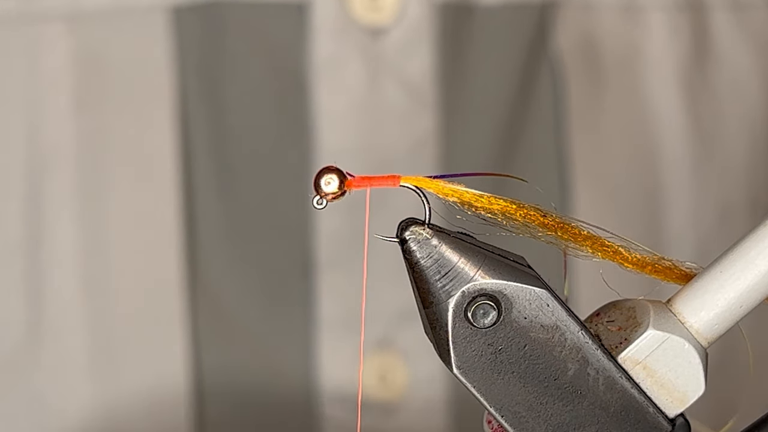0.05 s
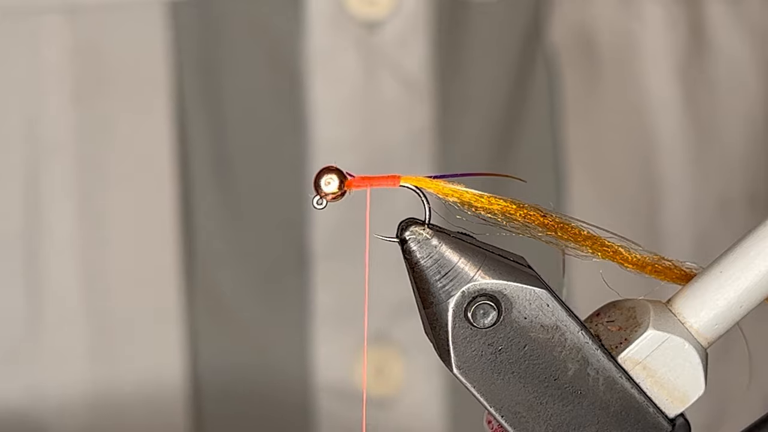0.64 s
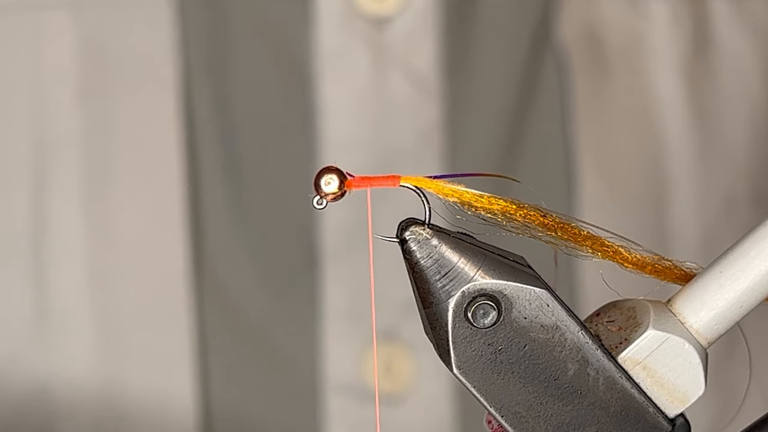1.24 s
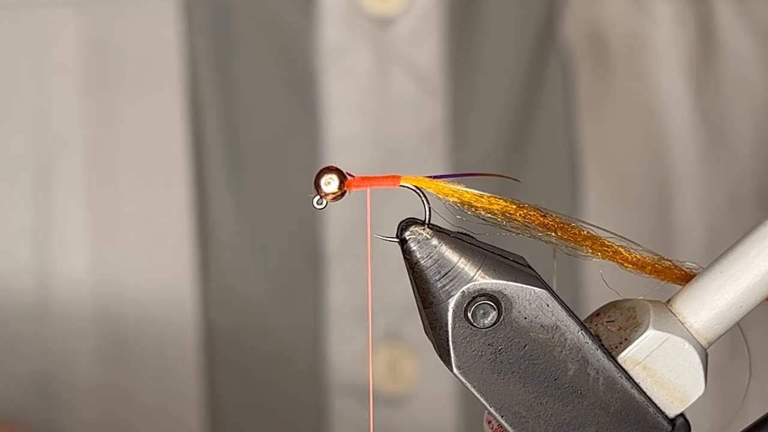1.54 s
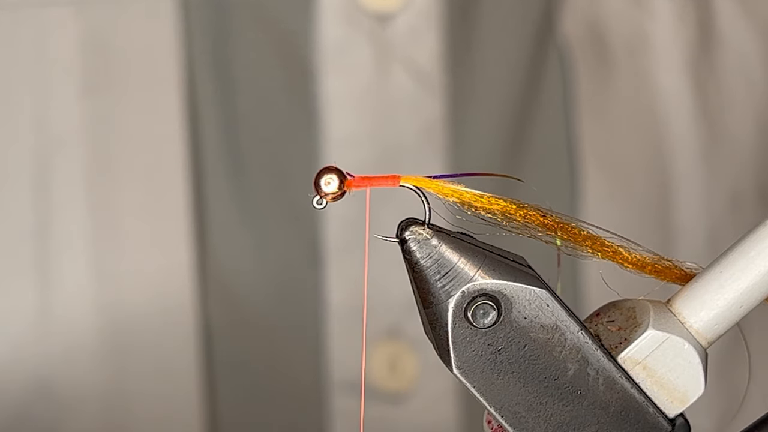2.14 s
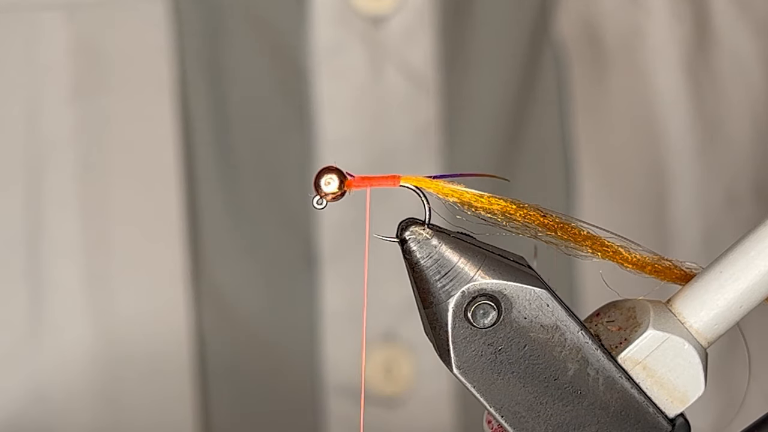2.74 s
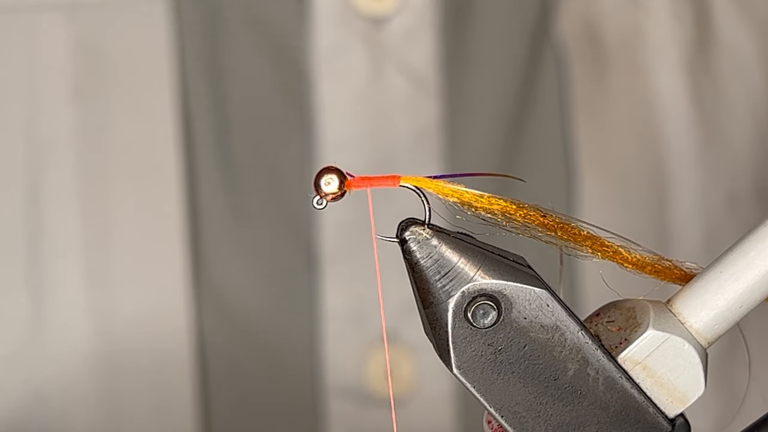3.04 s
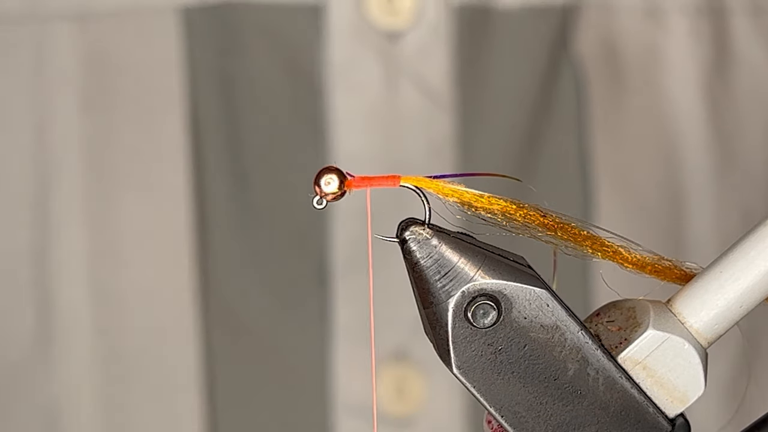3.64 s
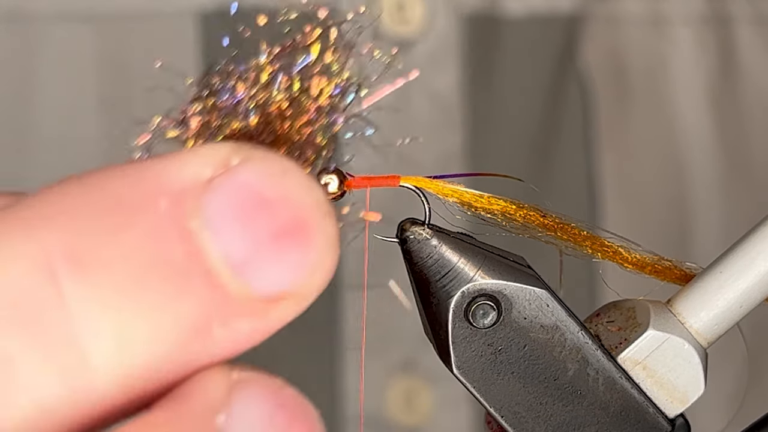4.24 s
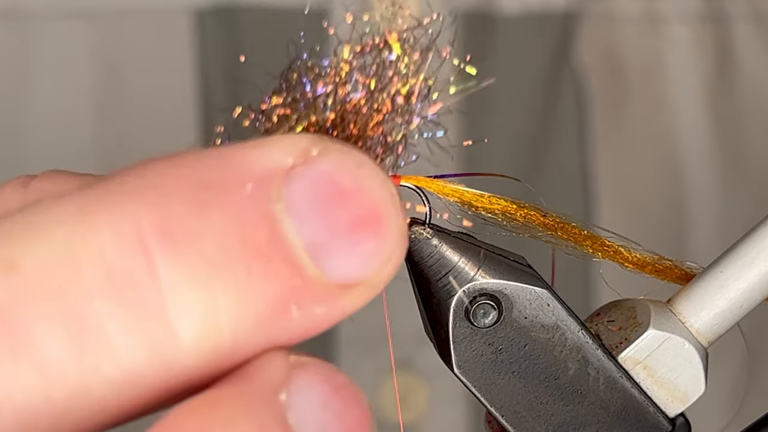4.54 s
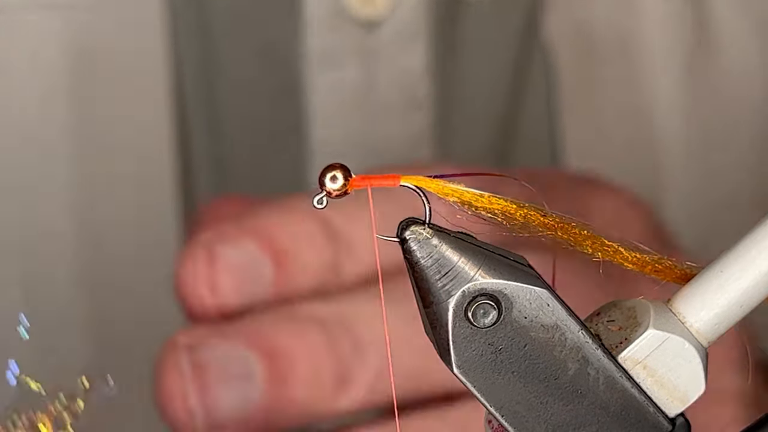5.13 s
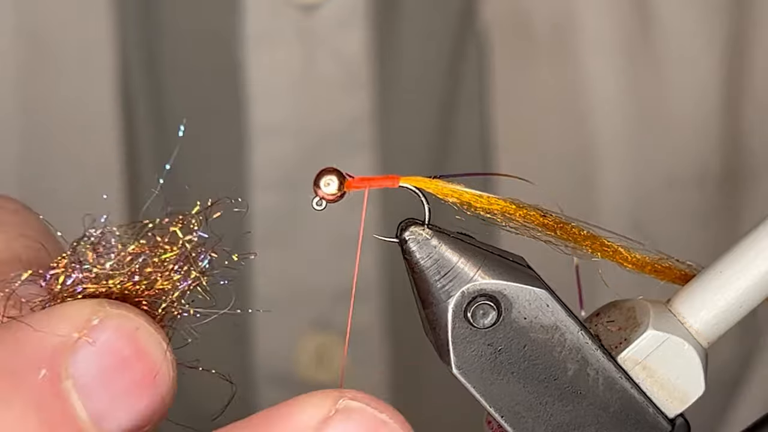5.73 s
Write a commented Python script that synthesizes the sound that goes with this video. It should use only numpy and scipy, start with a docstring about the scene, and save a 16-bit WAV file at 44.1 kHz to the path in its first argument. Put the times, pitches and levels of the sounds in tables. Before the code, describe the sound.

Fingers pull synthetic fibres from a thin plastic bag close to the microphone. The bag rustles and crinkles with sharp, irregular snaps for about three seconds. Then the handling gets softer and sparser: a few ticks and a faint sizzle of fibre tips brushing a metal hook, dying away near the end. Light knocks and low bumps come from the desk throughout, in a small, quiet room.

```python
"""A thin plastic bag rustles and snaps close by as fingers tease out synthetic dubbing at a fly-tying desk.
The film snaps by buckling; fibres and skin crackle by stick-slip friction, and fibre tips sizzle on the hook.
Knocking hands excite the modes of the desk, which also rumbles under leaning arms and after some knocks.
A small room reverberates; a faint low drone swells twice just past half way."""
import sys
import numpy as np
from scipy import signal
from scipy.fft import rfft, irfft, next_fast_len
from scipy.io import wavfile
from scipy.ndimage import uniform_filter1d

SR = 44100
rng = np.random.default_rng(int(sys.argv[2]) if len(sys.argv) > 2 else 0)


def master_out(mix):
    """Clip the mix to full scale and print it as 16-bit PCM to the path in sys.argv[1]."""
    frames = np.transpose(np.atleast_2d(mix))
    ceiling = np.clip(frames, -1, 1)
    pcm = np.round(ceiling * 32767).astype(np.int16)
    wavfile.write(sys.argv[1], SR, pcm)


N = 255025
TIME = np.arange(N) / SR
BAG_DOWN_S = 2.8  # the fingers hold the bag until then


def amp(db):
    """Amplitude ratio of a level in decibels."""
    return 10 ** (np.asarray(db) / 20)

def unit(x):
    """Normalisation to rms 1."""
    return x / np.sqrt(np.mean(x ** 2) + 1e-20)

def pulse(x):
    """Normalisation of a transient to the energy of 1 ms at rms 1."""
    return x * np.sqrt(SR / 1000 / np.sum(x ** 2))

def along(points, hz):
    """Interpolation of (f, value) points on a logarithmic frequency axis."""
    f, value = np.transpose(points)
    return np.interp(np.log(hz + 1), np.log(f), value)

def add(track, s, x):
    """Superposition of x on the track from time s."""
    part = track[..., max(round(s * SR), 0):][..., :x.shape[-1]]
    part += x[..., :part.shape[-1]]

def filtered(x, response):
    """Linear filtering: the spectrum of x times a frequency response."""
    size = next_fast_len(N + SR // 2)
    return irfft(rfft(x, size) * response(np.fft.rfftfreq(size, 1 / SR)), size)[..., :N]

def coloured(x, spectrum):
    """Spectral shaping by (f, level) points, at rms 1."""
    return unit(filtered(x, lambda hz: amp(along(spectrum, hz))))

def band(x, hz, octaves, order):
    """Resonance as a causal band-pass around hz."""
    edges = np.clip(hz * 2 ** (np.array([-.5, .5]) * octaves), 20, SR / 2 - 500)
    return signal.sosfilt(signal.butter(order, edges, "band", fs=SR, output="sos"), x)

def swells(rows, rise_share, roundness):
    """Power sum of (t, length, level) envelopes, each within 10 dB of its peak for its length."""
    power = np.zeros(N)
    for s, length, db in rows:
        near = slice(max(int((s - 2 * length) * SR), 0), int((s + 2 * length) * SR))
        offset = (TIME[near] - s) / length
        distance = np.maximum(-offset / rise_share, offset / (1 - rise_share))
        power[near] += amp(db - 10 * distance ** roundness) ** 2
    return np.sqrt(power)

def stick_slip(per_s, spread_db, smooth):
    """Stick-slip friction: random impulses, a few of them large, over smooth sliding noise."""
    slips = (rng.random(N) < per_s / SR) * rng.choice([-1, 1], N)
    size = amp(spread_db * np.minimum(rng.exponential(size=N), 4))
    return unit(slips * size) + smooth * rng.standard_normal(N)

def drifting(x, depth_db=2.3):
    """Spectral modulation: the colour drifts at random as the contact moves."""
    spectra = signal.stft(x, nperseg=512)[2]
    drift = rng.standard_normal(spectra.shape)
    for axis in (0, 1, 0, 1):
        drift = uniform_filter1d(drift, size=7, axis=axis)
    return signal.istft(spectra * amp(depth_db * unit(drift)), nperseg=512)[1][:N]

def ring(modes, t):
    """Free vibration: a sum of damped modes with scattered strengths and phases."""
    hz, db, t60 = np.transpose(modes)[:, :, None]
    gain = amp(db + 2 * rng.standard_normal(hz.shape))
    phase = .8 * rng.standard_normal(hz.shape)
    partials = gain * np.sin(2 * np.pi * hz * t + phase) * amp(-60 * t / t60)
    return np.sum(partials, 0) / np.linalg.norm(gain)

def burst(hz, octaves, life_s, order):
    """Transient rough vibration: decaying noise in one band."""
    t = np.arange(SR // 40) / SR
    noise = rng.standard_normal(len(t)) * t * np.exp(-t / life_s)
    return pulse(band(noise, hz, octaves, order))

def flip(hz, life_s):
    """Heavily damped oscillation: one facet of film springs over."""
    t = np.arange(SR // 40) / SR
    return pulse(t * np.exp(-t / life_s) * np.sin(2 * np.pi * (hz * t + rng.random())))


# Spectrum of the still room: f/Hz, relative level/dB
AIR_SPECTRUM = [(22, -23), (40, 1), (60, 6.5), (125, 2.5), (250, -4.5), (500, -10), (1000, -19),
                (1900, -12.5), (4000, -20.5), (8000, -36.5), (12000, -28.5), (16000, -30)]
def room_air():
    """Ambient noise, partly coherent between the two channels."""
    noise = rng.standard_normal(N) + 0.5 * rng.standard_normal((2, N))
    return amp(-73.5) * coloured(noise, AIR_SPECTRUM)

# Course of the low tone: t/s, f/Hz, level/dB
DRONE_COURSE = [(3.18, 151.8, -69), (3.26, 147.4, -67), (3.39, 133, -57), (3.46, 131, -64),
                (3.54, 129, -80.5), (3.59, 133.7, -65.5), (3.65, 130.2, -62.5), (3.72, 128.6, -96)]
def drone(waver_depth=0.33):
    """Amplitude modulation: slow noise makes a faint, sagging sine tone waver."""
    times, hz, db = np.transpose(DRONE_COURSE)
    phase = 2 * np.pi * np.cumsum(np.interp(TIME, times, hz)) / SR
    gain = amp(np.interp(TIME, times, db)) * (TIME > times[0]) * (TIME < times[-1])
    waver = unit(filtered(rng.standard_normal(N), lambda f: np.exp(-(f / 20) ** 2)))
    return np.sqrt(2) * gain * (1 + waver_depth * waver) * np.sin(phase)

# Response of the small room: f/Hz, T60/s, relative level/dB, side-to-mid ratio
ROOM_RESPONSE = [(123, 0.15, -2, 0.5), (300, 0.037, 6, .8), (900, 0.24, 0, 0.91), (2480, 0.088, 4, 0.5),
                 (4540, 0.35, -7, 0.2), (7920, 0.25, -3, 0.1), (15110, 0.16, 4, 0)]
def reverberation(x, gap_s):
    """Convolution with decaying reflections, whose pattern is renewed every 0.2 s as the hands move."""
    out, step = np.zeros((2, N)), SR // 5
    for start in range(0, N, step):
        hz, t, spectra = signal.stft(rng.standard_normal((2, SR // 2)), SR, nperseg=256)
        t60, db, spread = (along(np.array(ROOM_RESPONSE)[:, [0, k]], hz)[:, None] for k in (1, 2, 3))
        spectra = spectra * amp(db - 60 * t / t60) * np.array([np.ones_like(spread), spread])
        mid, side = signal.istft(spectra, SR, nperseg=256)[1]
        tail = np.array([mid + side, mid - side]) / np.linalg.norm(mid)
        add(out, start / SR + gap_s, signal.fftconvolve(x[None, start:start + step], tail, axes=1))
    return out

# Low swells of desk rumble and the thuds after knocks: peak t/s, length/s, level/dB
DESK_SWELLS = [(0.18, 0.052, -59.5), (0.44, 0.24, -63.5), (0.688, .04, -50.5), (0.75, .06, -59),
               (0.85, 0.11, -51.5), (0.95, 0.18, -54), (1.32, 0.12, -63), (1.435, 0.027, -54.5),
               (1.68, 0.12, -58.5), (1.825, 0.078, -59), (2.24, 0.24, -68.5), (2.98, 0.21, -63),
               (3.35, 0.24, -67), (3.8, 0.059, -61), (3.995, 0.038, -54.5), (4.345, 0.09, -64.5),
               (5.15, 0.14, -62.5), (5.46, 0.077, -62.5), (5.6, .1, -67.5)]
# Spectrum of the desk's rumble: f/Hz, relative level/dB
RUMBLE_SPECTRUM = [(20, -28.5), (40, -14.5), (58, 4.5), (85, -4.5), (140, 3.5), (200, -11), (320, -18),
                   (700, -51.5)]
def desk_rumble(rest_db=-78):
    """Structure-borne noise: the desk rumbles in low swells and thuds over a faint steady floor."""
    gain = np.hypot(swells(DESK_SWELLS, rise_share=0.3, roundness=1), amp(rest_db))
    return gain * coloured(rng.standard_normal(N), RUMBLE_SPECTRUM)

# Modes of the desk top and of its frame: f/Hz, relative level/dB, T60/s
TOP_MODES = [(277, 2.5, 0.067), (367.7, 6, .035), (505, -12, 0.081), (574, -1, 0.031), (664, -7.5, 0.017),
             (810, -7.5, 0.01), (992, -2, 0.05), (970, -13, 0.036), (1333, -3, 0.032), (1430, -17, .03)]
FRAME_MODES = [(55, -10, 0.35), (96, 0.5, 0.15), (123, -3, 0.18), (167, 1, 0.13), (223.6, -13.5, 0.027)]
# Light knocks of the hands: t/s, level/dB, contact f/Hz, relative thud level/dB
HAND_KNOCKS = [(.2835, -40, 480, -26), (.392, -38, 614, -24), (.6725, -30, 584, -7), (0.815, -46, 356, 9.5),
               (.978, -39, 600, -16), (1.439, -41.5, 790, -16), (1.636, -46.5, 400, -18),
               (1.698, -39, 770, -6), (2.104, -46.5, 324, -14.5), (3.165, -36.5, 840, -22),
               (3.961, -41, 530, -12), (4.803, -50, 326.3, -8.5), (5.075, -72.5, 278, 24),
               (5.425, -71, 337, 21)]
def desk_knocks():
    """Impact excitation: a knock favours the modes near its contact frequency and shakes the frame."""
    out, t = np.zeros(N), np.arange(SR // 2) / SR
    slow_onset, fast_onset = 1 - np.exp(-t / .003), 1 - np.exp(-t / .0007)
    for s, db, contact_hz, thud_db in HAND_KNOCKS:
        top = ring([(f, level - 9 * np.log2(f / contact_hz) ** 2, t60) for f, level, t60 in TOP_MODES], t)
        tilt = 5 * np.log2(contact_hz / 600)  # dB/octave: a soft contact moves the lowest modes most
        thud = ring([(f, level + tilt * np.log2(f), t60) for f, level, t60 in FRAME_MODES], t)
        add(out, s, amp(db) * (fast_onset * top + amp(thud_db) * slow_onset * thud))
    return out

# Short noise swells (skids, squeaks and the dull body of one knock):
# middle t/s, half-length/s, f/Hz, width/octaves, level/dB
NOISE_SWELLS = [(0.087, .02, 776, 0.55, -54.5), (.393, 0.0073, 629, .9, -38.5),
                (0.957, 0.022, 2850, 0.28, -46), (0.995, 0.053, 2500, 0.37, -53.5),
                (1.166, 0.029, 3080, 0.13, -57.5), (1.69, 0.0072, 3820, 0.81, -44.5),
                (2.262, 0.1, 2070, 0.46, -59.5), (2.61, 0.02, 705, 1.2, -55), (2.982, 0.13, 800, 0.63, -64),
                (3.161, 0.02, 775, 1.04, -51.5), (3.355, 0.028, 2820, 0.27, -58),
                (3.9, 0.017, 2240, 1.4, -51), (3.968, 0.018, 560, 0.86, -52.5),
                (4.713, .008, 3700, 0.5, -57.5), (4.715, .006, 8700, .17, -57.5)]
def noise_swells():
    """Band-limited noise: each short sound swells and fades in its own band."""
    out = np.zeros(N)
    for s, half_length, hz, octaves, db in NOISE_SWELLS:
        swell = np.hanning(round(2 * half_length * SR))
        noise = unit(band(rng.standard_normal(len(swell)), hz, octaves, order=2))
        add(out, s - half_length, amp(db) * swell * noise)
    return out

# Even passes of the tuft over hook and thread: t/s, length/s, level/dB
HOOK_PASSES = [(3.0, 0.16, -67), (3.235, 0.19, -64), (3.53, 0.13, -75), (4.245, 0.048, -56.5),
               (4.455, 0.4, -70)]
# Spectrum of fibre tips on steel: f/Hz, relative level/dB
SIZZLE_SPECTRUM = [(2500, -41), (4300, -13), (5500, -2.5), (6800, -4), (8300, -3), (9200, -25),
                   (12000, -17), (16500, -27)]
def hook_sizzle():
    """Dense stick-slip: fibre tips catch on steel so often that the impulses merge."""
    slips = stick_slip(per_s=8000, spread_db=8, smooth=0.32)
    gain = swells(HOOK_PASSES, rise_share=0.46, roundness=15)
    return gain * coloured(drifting(slips), SIZZLE_SPECTRUM)

# Finger strokes through the tuft: peak t/s, length/s, fibre level/dB, skin level/dB
FINGER_STROKES = [(0.043, 0.047, -55, -60.5), (0.108, 0.086, -62, -62.5), (0.168, 0.021, -56.5, -57),
                  (0.261, 0.089, -62, -67), (0.381, 0.024, -51, -62.5), (0.4, 0.1, -79, -66),
                  (0.55, 0.057, -53.5, -54.5), (0.625, .08, -50, -50), (0.741, 0.087, -45, -49),
                  (0.823, 0.028, -60.5, -61.5), (0.965, 0.094, -49.5, -50), (1.07, 0.2, -57.5, -60),
                  (1.16, 0.15, -52, -61.5), (1.29, .1, -59.5, -60), (1.456, 0.19, -61.5, -72.5),
                  (1.632, 0.027, -51.5, -55), (1.707, 0.095, -53.5, -50.5), (1.802, 0.052, -44, -58),
                  (1.907, 0.18, -58.5, -62), (2.126, .07, -58, -60), (2.208, 0.075, -61.5, -61.5),
                  (2.304, 0.12, -64, -59), (2.429, 0.051, -58.5, -64.5), (2.59, 0.11, -67, -65),
                  (2.661, 0.12, -62.5, -64), (2.77, 0.073, -62.5, -69), (2.856, 0.16, -83, -72.5),
                  (2.982, .13, -59.5, -64.5), (3.173, 0.096, -55, -61.5), (3.337, 0.072, -57, -61),
                  (3.507, 0.096, -64.5, -70), (3.666, 0.068, -74.5, -70.5), (3.787, 0.04, -54.5, -59.5),
                  (3.833, 0.096, -49.5, -66.5), (3.965, 0.094, -66.5, -61.5), (4.163, 0.039, -72.5, -63.5),
                  (4.237, 0.093, -61.5, -83), (4.374, 0.13, -64.5, -85), (4.703, 0.057, -73, -67),
                  (5.144, 0.24, -69, -65), (5.638, 0.58, -75.5, -73.5)]
def finger_gain(column, grip_db):
    """Incoherent addition: the strokes of one level column sum in power with the grip on the bag."""
    strokes = swells(np.array(FINGER_STROKES)[:, [0, 1, column]], rise_share=0.36, roundness=1.2)
    return np.hypot(strokes, amp(grip_db) * (TIME < BAG_DOWN_S))

# Spectrum of skin and sleeves: f/Hz, relative level/dB
SKIN_SPECTRUM = [(100, -18.5), (220, 1), (400, -3), (600, -5), (800, -2.5), (1100, -4), (1500, -7.5),
                 (2200, -7), (3500, -13.5), (8000, -35.5)]
def skin_rub():
    """Friction of soft surfaces: skin and sleeves rub with little treble."""
    return coloured(drifting(stick_slip(per_s=1200, spread_db=3.5, smooth=1)), SKIN_SPECTRUM)

# Spectrum of rubbing fibres: f/Hz, relative level/dB
FIBRE_SPECTRUM = [(600, -32.5), (1300, -7), (2000, -5), (2800, 1), (4000, -3), (5500, 1.5), (7700, 0),
                  (9500, -6.5), (11500, -10), (13200, -16), (15200, -9), (16500, -28.5)]
def fibre_crackle():
    """Stick-slip of fibres: coarse against the film, far more even in the loose tuft."""
    on_film = unit(stick_slip(per_s=900, spread_db=4.2, smooth=.65))
    in_tuft = unit(stick_slip(per_s=4000, spread_db=3.5, smooth=1.1))
    return coloured(drifting(np.where(TIME < BAG_DOWN_S, on_film, in_tuft)), FIBRE_SPECTRUM)

def bag_crinkle(fibre_gain, per_s=90, lowest_hz=2300, octaves=1.85, range_db=13.5):
    """Small-scale buckling: creases give way at random, louder the harder the fingers rub."""
    out = np.zeros(N)
    for when, pitch, size in rng.random((round(per_s * BAG_DOWN_S), 3)):
        s = when * BAG_DOWN_S
        tick = flip(lowest_hz * 2 ** (octaves * pitch), life_s=.00018)
        add(out, s, fibre_gain[int(s * SR)] * amp(range_db * size ** 2) * tick)
    return out

# Buckles of the film and flicks of stiff fibres:
# t/s, level/dB, tick f/Hz, relative flex level/dB, relative sparkle level/dB
BUCKLES = [(0.0246, -39, 2430, -9, -39), (0.0915, -43, 3960, -18, -17), (0.283, -37.5, 4940, -7.5, -10),
           (0.373, -36.5, 4400, -8.5, -20), (0.3884, -41.5, 4470, -21, -5), (0.3915, -35, 3630, -12, -18),
           (0.4904, -50.5, 2000, -25, -34), (0.5669, -40.5, 4120, -0.5, -6.5),
           (0.627, -22.5, 5960, -13.5, -10), (0.6714, -14, 6200, -11, -20), (0.7188, -33, 5240, -23, -13),
           (0.728, -25.5, 5360, -24, -0.5), (0.731, -28.5, 5170, -24, -3.5),
           (0.7438, -36.5, 3200, -11.5, -14), (0.7576, -33.5, 4670, -18, -7), (0.82, -46, 7020, -2.5, 7.5),
           (0.945, -24, 3970, -12.5, -16), (0.9939, -41, 2450, 5, -4), (1.058, -31, 7250, -7.5, -25),
           (1.1129, -42.5, 4940, -17, -5), (1.162, -43.5, 3900, -1.5, 0), (1.1719, -34, 7400, -15, -13),
           (1.2264, -34, 2790, -14.5, -20), (1.3287, -29.5, 4700, -16.5, -14),
           (1.439, -32.5, 4100, -10, -14), (1.472, -35.5, 3970, -19, -15), (1.587, -43.5, 3200, -11.5, -16),
           (1.6356, -37.5, 5100, -8.5, -7.5), (1.6956, -23, 4900, -20, -8.5),
           (1.7179, -22.5, 4530, -12, -8), (1.8059, -40, 4580, 0, 3), (1.8917, -28.5, 5100, -8.5, -15),
           (1.9181, -25.5, 5150, -15, -4.5), (2.0705, -51, 6500, -1.5, -11.5), (2.1031, -37, 4060, -9, -13),
           (2.2062, -29, 5500, -12, -26), (2.21, -22, 4620, -18, -16), (2.2475, -38.5, 5700, -25, -10),
           (2.2537, -40, 6300, -12, -4), (2.2743, -23.5, 5940, -10.5, -13),
           (2.3641, -37.5, 4400, -8.5, -24), (2.4299, -38, 5030, -10, -20), (2.5856, -34, 3560, -10, -28),
           (2.636, -45, 2140, -1, -36), (2.6622, -47.5, 3900, 0, -16), (2.7416, -27.5, 4470, -12.5, -20),
           (2.952, -56, 3400, -3, -26), (3.1323, -38.5, 2860, -12, -39), (3.1634, -40, 3150, -2, -6),
           (3.3134, -35, 5100, -14, -11), (3.3869, -47, 4860, -3.5, -28), (3.5422, -47, 5940, -8.5, -14.5),
           (3.7726, -44.5, 3500, -11, -17), (3.943, -46.5, 2980, -19, -21), (3.9595, -33.5, 4540, -4, -15),
           (4.1868, -41, 3570, -9.5, -35), (4.2482, -53.5, 6200, -16, -11), (4.3397, -41.5, 3240, -14, -23),
           (4.3433, -29.5, 4630, -10.5, -41), (4.714, -56, 4640, -18, -9.5), (4.726, -47.5, 2140, -14, -18),
           (4.7716, -55, 8640, -18, 1.5), (4.8002, -54.5, 2380, 5.5, -27)]
def snaps():
    """Snap-through buckling: a crease cracks, its edge sparkles and the sheet flexes."""
    out = np.zeros(N)
    for s, db, hz, flex_db, sparkle_db in BUCKLES:
        crack = burst(0.89 * hz, octaves=1.855, life_s=.00033, order=4) + 0.23 * flip(hz, life_s=.000047)
        add(out, s, amp(db) * pulse(crack))
        add(out, s - .0005, amp(db + sparkle_db) * burst(12300, octaves=0.6, life_s=.00048, order=3))
        add(out, s, amp(db + flex_db) * burst(1064, octaves=0.99, life_s=.00071, order=2))
        if s < BAG_DOWN_S:  # a buckle of the bag trips two smaller ones beside it
            for wait, pitch, size in rng.standard_normal((2, 3)):
                tick = burst(hz * 2 ** (.5 * pitch), octaves=0.77, life_s=.0003, order=2)
                add(out, s + .008 * np.exp(.5 * wait), amp(db - 21 + 3.5 * size) * tick)
    return out

def scene():
    """Superposition of the direct sound of the hands, its reverberation and the background."""
    fibre_gain, skin_gain = finger_gain(column=2, grip_db=-79), finger_gain(column=3, grip_db=-74.5)
    rustle = noise_swells() + hook_sizzle() + skin_gain * skin_rub() + fibre_gain * fibre_crackle()
    direct = desk_rumble() + desk_knocks() + rustle + bag_crinkle(fibre_gain) + snaps()
    return room_air() + drone() + amp(-10.5) * reverberation(direct, gap_s=.0028) + direct

# Phase between the two microphone ports: f/Hz, lead of the left/rad
PORT_LEAD = [(500, 0), (1500, -.1), (3900, -.5), (6000, -.2), (7750, -.5), (8600, .2), (9500, 2.1),
             (10300, 3.2), (11600, 5.6), (12900, 7.9), (13950, 9.5), (15100, 11.7), (16000, 12.6)]
# Balance between the ports: f/Hz, left minus right level/dB
PORT_LEVEL = [(120, 0), (280, 1.4), (900, 1.8), (1500, 2.6), (2300, -.6), (4000, .1)]
def record(dry, cutoff_hz=16500):
    """Phase and level differences between two close ports, followed by a steep low-pass."""
    sides = np.array([[.5], [-.5]])
    def response(hz):
        ports = amp(sides * along(PORT_LEVEL, hz)) * np.exp(1j * sides * along(PORT_LEAD, hz))
        return ports / np.sqrt(1 + (hz / cutoff_hz) ** 160)
    return filtered(dry, response)


dry = scene()
out = record(dry)
master_out(out)
```